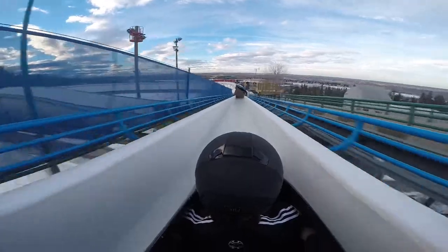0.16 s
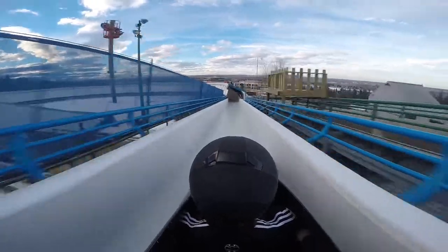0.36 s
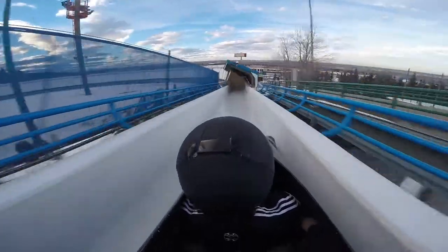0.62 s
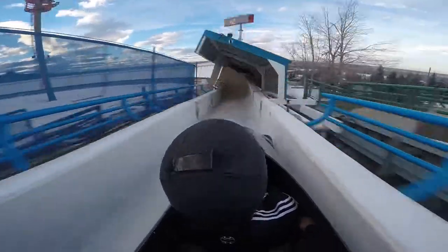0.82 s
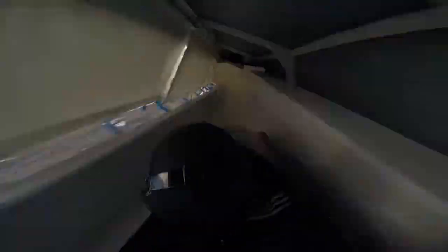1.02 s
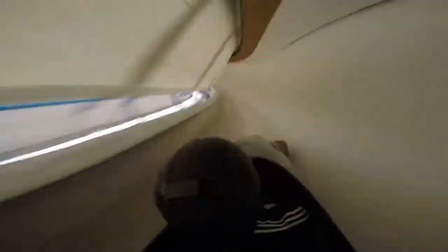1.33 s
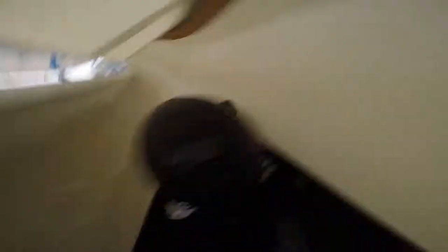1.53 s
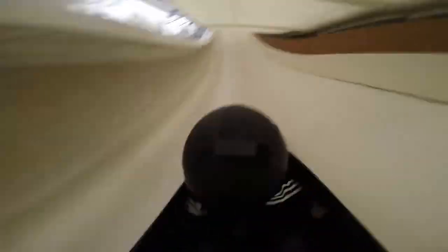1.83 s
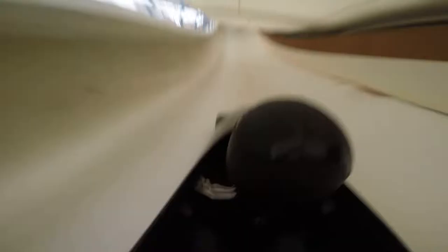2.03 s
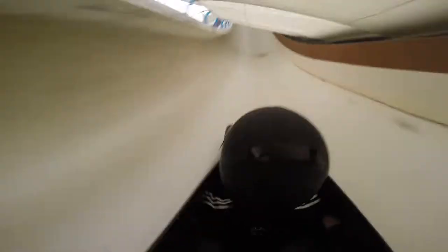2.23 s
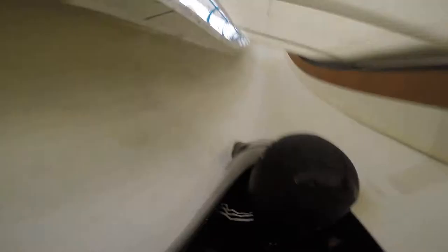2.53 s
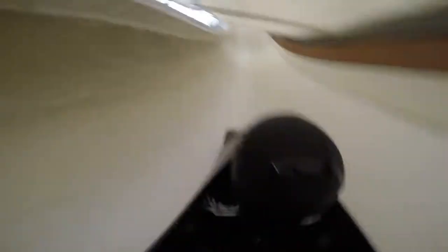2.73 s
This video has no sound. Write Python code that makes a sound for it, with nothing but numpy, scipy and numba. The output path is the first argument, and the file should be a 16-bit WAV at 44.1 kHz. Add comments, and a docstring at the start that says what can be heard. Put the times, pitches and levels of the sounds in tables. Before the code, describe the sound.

On-board bobsled ride, close microphone inside a sealed case: steady boxy wind and runner hiss over a low drone, then heavy distorted jolts, deep rumble and sharp plastic ticks as the hiss fades and flickers.

```python
"""Bobsled track, inside a closed camera case: a ride down a straight and into a banked curve.
Wind and runner hiss is noise through the case resonances; on the straight the mount sings as a wavering sine.
Rough ice, as random bumps, rings mount and hull; jolts thump as decaying sines, loose parts click,
ice chips spray as short bright noise. Gain control ducks after loud peaks, and the converter clips."""
import sys
import numpy as np
from scipy import signal
from scipy.fft import rfft, irfft
from scipy.io import wavfile
from scipy.ndimage import uniform_filter1d
from numba import njit

SR = 44100
rng = np.random.default_rng(int(sys.argv[2]) if len(sys.argv) > 2 else 0)


def to_linear_factor(level_db):
    """Convert decibel levels (scalar or array-like) to linear amplitude factors."""
    exponent = np.asarray(level_db, float) / 20
    return 10 ** exponent


def pcm_store(signal):
    """Save signal as 16-bit PCM."""
    levels = np.round(np.clip(np.atleast_2d(signal), -1, 1) * 32767)
    wavfile.write(sys.argv[1], SR, levels.astype(np.int16).T)


N = 126126


def unit(x):
    """Scaled to rms 1."""
    return x / np.sqrt(np.mean(x ** 2))


def curve(table, column):
    """A table column joined by straight lines in time."""
    rows = np.array(table)
    return np.interp(np.arange(N) / SR, rows[:, 0], rows[:, column])


def ring(x, hz, width_hz):
    """Two-pole resonance, gain 1 at the centre."""
    return signal.lfilter(*signal.iirpeak(hz, hz / width_hz, fs=SR), x)


def walk(rate_hz):
    """Random levels held 1 / rate_hz, smoothed twice over that time; spread about 0.8."""
    hold = int(SR / rate_hz)
    held = rng.standard_normal(N)[np.arange(N + hold) // hold]
    smooth = uniform_filter1d(uniform_filter1d(held, hold), hold)
    return 1.11 * smooth[:N]


def burst(start_s, length_s):
    """Envelope of one event: quick linear rise, Gaussian fall."""
    age = np.maximum(np.arange(N) / SR - start_s, 0) / length_s
    return np.minimum(2.5 * age, 1) * np.exp(-age ** 2)


@njit
def follow(x, attack, release):
    """One-pole follower of |x|; attack and release are steps per sample."""
    e, out = 0., np.empty(len(x))
    for i in range(len(x)):
        e += (abs(x[i]) - e) * (attack if abs(x[i]) > e else release)
        out[i] = e
    return out


def rush():
    """Gritty turbulence of air and runners excites the case; each resonance flickers on its own."""
    # rush at the case: t/s, level/dB
    rush_level = [(0, -11), (.14, -9), (.62, -11.5), (.85, -12), (1.1, -10.5), (1.39, -10.5), (1.435, -15),
                  (1.5, -14), (1.565, -14), (1.59, -20.5), (1.63, -19.5), (1.67, -16.5), (1.72, -19.5),
                  (1.745, -21), (1.78, -21.5), (1.81, -23), (1.85, -22.5), (1.9, -28.5), (1.938, -19),
                  (1.955, -21.5), (1.97, -19), (1.985, -28), (2.03, -30), (2.065, -19.5), (2.095, -23.5),
                  (2.13, -26.5), (2.17, -30), (2.21, -23), (2.36, -22), (2.52, -17.5), (2.6, -20),
                  (2.63, -19.5), (2.645, -27.5), (2.72, -22.5), (2.79, -24.5), (2.84, -20), (2.86, -25)]
    # case cavity resonances: f/Hz, width/Hz (before widening), level/dB
    case_modes = [(1710, 260, -1.5), (1983, 315, -3), (2311, 196, 1), (2812, 310, -1), (3484, 312, -3.5),
                  (4283, 306, -13.5), (5300, 360, -7.5), (5684, 515, -11.5), (6950, 495, -13.5),
                  (7500, 465, -18), (9270, 1080, -22.5), (11000, 1600, -32.5), (13700, 1450, -33)]
    # leak through the case wall below the resonances: f/Hz, gain/dB
    wall_leak = np.array([(140, 0), (230, -11.5), (338, -13.5), (605, -11.5), (1140, -2), (1400, 0),
                          (1820, -26), (3080, -120)])
    leak_db = -17  # re case
    gust_db, flicker_db, grit_db = 1.5, 0.8, 0.5
    widening = 1.85

    air = rng.standard_normal(N) * to_linear_factor(grit_db * walk(700) + gust_db * walk(25.2))
    case = np.zeros(N)
    for k, (hz, width_hz, db) in enumerate(case_modes):
        width_hz = widening * width_hz
        mode = ring(ring(air, hz, width_hz), hz, width_hz)
        case += (-1) ** k * to_linear_factor(db + flicker_db * walk(34)) * mode  # neighbours in opposite sign
    hz = np.fft.rfftfreq(N, 1 / SR) + 1
    wall_db = np.interp(np.log(hz), np.log(wall_leak[:, 0]), wall_leak[:, 1])
    leak = irfft(rfft(air) * to_linear_factor(wall_db), N)
    return (unit(case) + to_linear_factor(leak_db) * unit(leak)) * to_linear_factor(curve(rush_level, column=1))


def shaking():
    """Random bumps in the ice keep the modes of mount and hull ringing."""
    # shaking from rough ice: t/s, mount level/dB, hull level/dB
    shake_level = [(0, -11, -14), (.1, -17, -23), (.4, -21.5, -22.5), (.7, -18.5, -25), (1.0, -22, -22),
                   (1.25, -22.5, -18.5), (1.43, -23, -15.5), (1.68, -24.5, -20), (1.79, -33, -19),
                   (1.9, -24, -17.5), (2.02, -32, -22), (2.21, -29.5, -24.5), (2.36, -23, -23),
                   (2.5, -27.5, -18), (2.6, -30, -18.5), (2.68, -33.5, -20.5), (2.86, -26, -21.5)]
    # mount modes: f/Hz, width/Hz (first pass), level/dB
    mount_modes = [(176, 26, -5), (150, 42, 0), (132, 54, -16), (330, 440, -19)]
    # hull modes: f/Hz, width/Hz (first pass), level/dB
    hull_modes = [(29, 17, 0), (40, 42, -1.5), (57, 9, -6.5), (90, 30.4, -2)]
    bumps_per_s, bump_spread_db = 900, 0.5

    out = np.zeros(N)
    for modes, column in ((mount_modes, 1), (hull_modes, 2)):
        hits = rng.random(N) < bumps_per_s / SR
        bumps = hits * rng.standard_normal(N) * to_linear_factor(bump_spread_db * walk(30.07))
        body = sum(to_linear_factor(db) * ring(ring(bumps, hz, width_hz), hz, 3.83 * width_hz)
                   for hz, width_hz, db in modes)
        out += unit(body) * to_linear_factor(curve(shake_level, column))
    return out


def hum():
    """On the smooth straight the mount sings near its main mode; the tone dies where the curve begins."""
    # singing of the mount: t/s, f/Hz, rms level/dB
    hum_track = [(0.08, 152.2, -23), (0.212, 152.6, -20), (0.26, 162, -17), (0.304, 166.3, -24),
                 (0.322, 163.7, -20), (0.358, 176, -19), (0.478, 179.2, -19.5), (0.572, 176, -23),
                 (0.626, 186.8, -12.5), (0.672, 171.1, -25), (0.746, 178.5, -20), (0.818, 157.5, -32),
                 (0.872, 166.9, -9), (0.898, 176.3, -35), (0.938, 185.1, -11.5), (0.958, 180.2, -31),
                 (1.032, 152.5, -18.5), (1.038, 150, -48), (1.096, 145.5, -37), (1.144, 166.4, -18.5),
                 (1.202, 154.5, -24), (1.226, 152.7, -16.5), (1.27, 163, -19), (1.306, 146, -17),
                 (1.364, 149, -20), (1.38, 154, -34)]
    wobble, end_s, fade_s = 0.03, 1.4, 0.028  # wobble as a fraction of pitch

    hz = curve(hum_track, column=1) * (1 + wobble * walk(40))
    phase = 2 * np.pi * np.cumsum(hz) / SR
    fade = np.clip((end_s - np.arange(N) / SR) / fade_s, 0, 1)
    return np.sqrt(2) * np.sin(phase) * to_linear_factor(curve(hum_track, column=2)) * fade


def sprays():
    """Ice chips spray: brief bursts of high band-passed noise."""
    # sprays: t/s, relative level/dB, f/Hz, length/s
    spray_events = [(1.652, -16, 10300, 0.0081), (1.667, -13, 11700, .008), (1.693, -23, 12600, .006),
                    (1.818, -23, 11000, .004), (1.869, -25, 12300, .003)]
    gain, width_hz = 2.1 * to_linear_factor(-9), 3000

    out = np.zeros(N)
    for start_s, db, hz, length_s in spray_events:
        hiss = ring(ring(rng.standard_normal(N), hz, width_hz), hz, width_hz)
        out += gain * to_linear_factor(db) * hiss * burst(start_s, length_s)
    return out


def clicks():
    """Loose parts hit the case: a tick of a few cycles with a broad edge, and a short rattle at its pitch."""
    # clicks: t/s, level/dB, f/Hz, rattle length/s, bright edge re click/dB
    click_events = [(0.0425, -9.5, 356, 0.0076, -40), (1.182, -23, 422, 0.0038, -40),
                    (1.267, -17, 428.4, 0.0065, -40), (1.311, -19, 400, 0.0086, -40),
                    (1.428, -13.5, 394, 0.0043, -40), (1.587, -20, 500, .002, -40),
                    (1.6998, 1, 1850, .0012, -22), (1.7006, -17, 750, 0.0018, -30),
                    (1.7559, 0, 2700, 0.0027, 0), (1.759, -6.5, 1910, 0.0027, -19),
                    (1.757, -19, 520, .002, -40), (1.8065, -16, 1780, .004, -30),
                    (1.8695, -3, 1950, .001, -15), (1.936, -14.5, 2680, 0.009, -20),
                    (1.9735, -2, 2200, .0012, -11), (2.061, -15, 2860, 0.0024, -20),
                    (2.6165, -3, 2800, .004, -30), (2.621, -6.5, 2100, .003, -25),
                    (2.6258, -12, 330, 0.0038, -40)]
    decay_cycles, rattle_db = 2.33, -5.5
    edge_hz, edge_decay_s = 5200, 0.00014

    out, t = np.zeros(N), np.arange(SR // 20) / SR
    for start_s, db, hz, length_s, edge_db in click_events:
        tick = np.sin(2 * np.pi * hz * t) * np.exp(-hz * t / decay_cycles)
        edge = to_linear_factor(edge_db) * np.sin(2 * np.pi * edge_hz * t) * np.exp(-t / edge_decay_s)
        noise = ring(ring(rng.standard_normal(len(t)), hz, hz / 2), hz, hz)
        rattle = to_linear_factor(rattle_db) * unit(noise) * np.exp(-(t / length_s) ** 2)
        body = ring(ring(tick + rattle, hz, 1.6 * hz), hz, 1.6 * hz)
        i = int(start_s * SR)
        out[i:i + len(t)] += to_linear_factor(db) * (0.99 * body + edge)
    return out


def jolts():
    """A short push sets off the mount ring or the slower swing of the hull."""
    # jolts that ring the mount: t/s, nominal swing/dB, f/Hz, t60/s, direction
    mount_jolts = [(0.0388, -24, 145, 0.069, 1), (0.1412, -6, 170, 0.12, 1), (0.2161, -4.5, 150, 0.13, -1),
                   (0.3203, -5, 163, 0.2, -1), (0.5721, -7.5, 171.3, 0.37, 1),
                   (0.9129, -10.5, 195.4, 0.15, 1), (1.2534, -5.5, 167, 0.12, -1),
                   (1.4058, -0.5, 150, 0.1, -1), (1.4325, 3, 163, 0.095, 1), (1.452, -5, 150, 0.12, 1),
                   (1.5113, -3, 159, 0.076, -1), (1.5813, 2, 168, 0.066, -1), (1.608, -9, 90, 0.08, -1),
                   (1.6469, -3.5, 155, 0.076, 1), (1.7567, -1.5, 158.3, 0.08, 1),
                   (1.8092, -4, 139, 0.079, 1), (1.8686, -5.5, 177, 0.045, 1),
                   (1.9734, -0.5, 181.6, 0.069, 1), (2.0825, -9, 150, 0.08, 1),
                   (2.091, -5.5, 74, 0.088, -1), (2.2341, -9, 139, 0.06, 1), (2.5385, -7.5, 164, 0.087, -1),
                   (2.617, -3.4, 154.6, 0.097, 1), (2.626, 4.5, 172, 0.037, -1), (2.7294, -9, 170, 0.11, 1),
                   (2.8295, -1, 150, 0.061, 1)]
    # heaves of the hull: t/s, nominal swing/dB, f/Hz, t60/s, direction
    hull_heaves = [(1.416, -5, 63.7, 0.15, 1), (1.5969, -0.5, 42, 0.25, 1), (1.686, -6.5, 45, 0.15, -1),
                   (1.7966, -5, 53.5, 0.13, -1), (1.8644, -7, 43.2, 0.43, -1), (1.881, -21, 55.6, 0.17, 1),
                   (1.9599, -4.5, 61.8, 0.22, -1), (2.066, -4.5, 41.7, 0.23, -1),
                   (2.1876, -8, 41.8, 0.33, 1), (2.5345, -7.5, 46.4, 0.31, -1), (2.7381, -12, 42, 0.43, 1)]
    push_s, rise_cycles = 0.0011, 0.08

    out, t = np.zeros(N + SR), np.arange(SR // 2) / SR
    for start_s, db, hz, t60_s, way in list(mount_jolts) + list(hull_heaves):
        rise = 1.074 * (1 - np.exp(-hz * t / rise_cycles))
        decay = np.exp(-np.log(1000) * t / t60_s)
        i = int(start_s * SR)
        out[i:i + len(t)] += np.sign(way) * to_linear_factor(db) * np.sin(2 * np.pi * hz * t) * decay * rise
    return uniform_filter1d(out[:N], int(push_s * SR))


def scene():
    """One microphone feeds both channels."""
    mono = rush() + shaking() + hum() + sprays() + clicks() + jolts()
    return np.tile(mono, (2, 1))


def top_cut(x):
    """Nothing passes above the cut-off."""
    return signal.sosfilt(signal.butter(12, 15640, fs=SR, output="sos"), x)


def record(dry):
    """Gain control pulls down after loud peaks, then the converter clips at full scale."""
    threshold_db, ratio, attack_s, release_s = -5, 3.3, 0.0054, 0.11
    envelope = follow(dry[0], 1 / (attack_s * SR), 1 / (release_s * SR))
    gain = np.minimum(to_linear_factor(threshold_db) / (envelope + 1e-9), 1) ** (1 - 1 / ratio)
    mix = np.clip(dry * gain, -1, 1)
    return top_cut(mix)


dry = scene()
out = record(dry)
pcm_store(out)
```